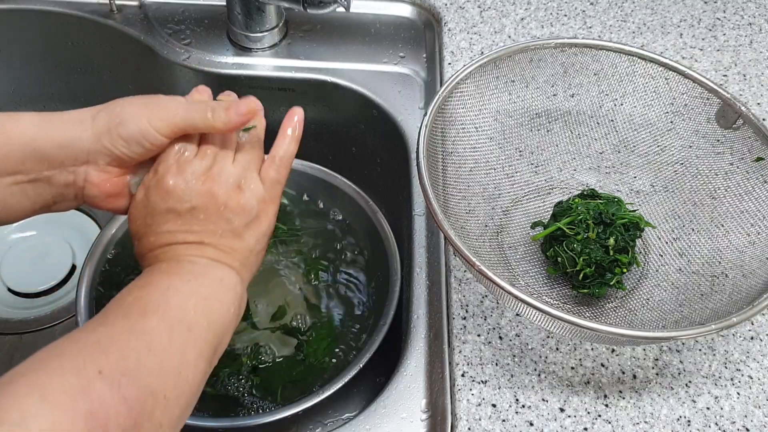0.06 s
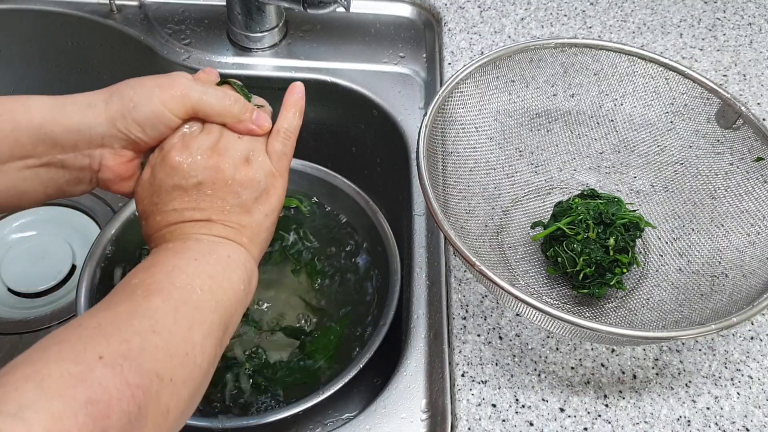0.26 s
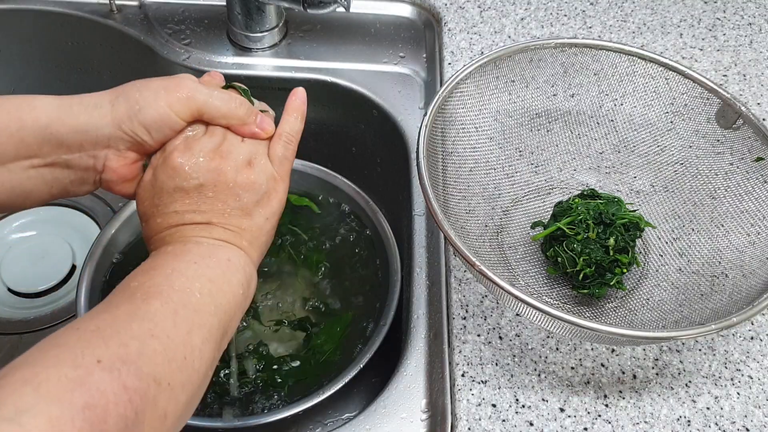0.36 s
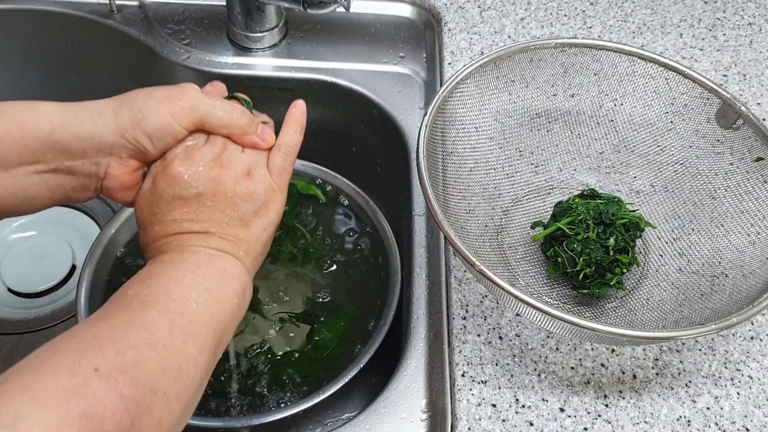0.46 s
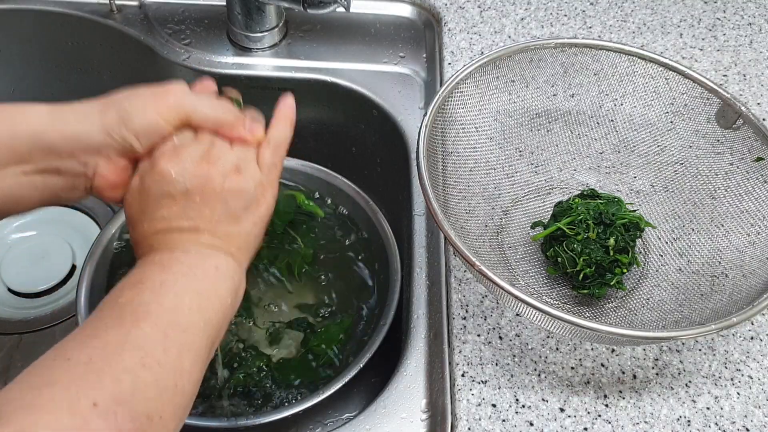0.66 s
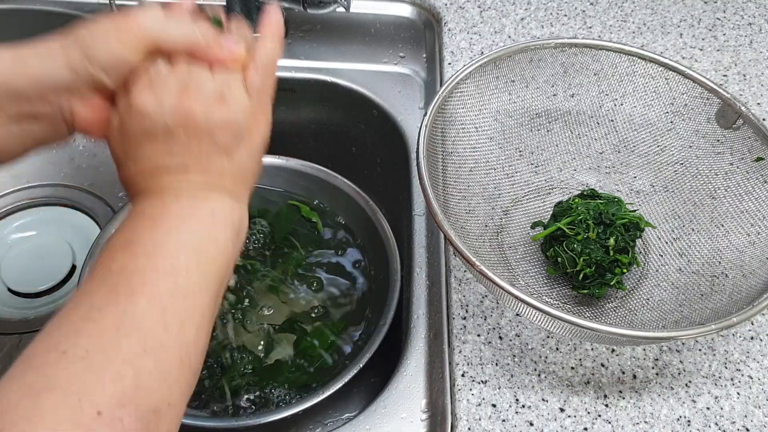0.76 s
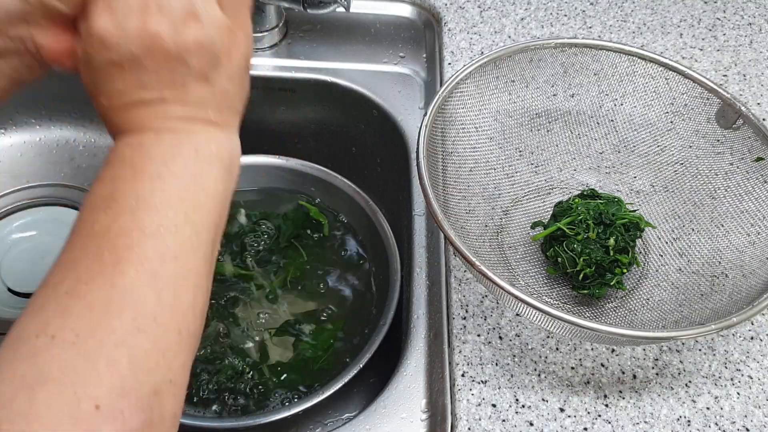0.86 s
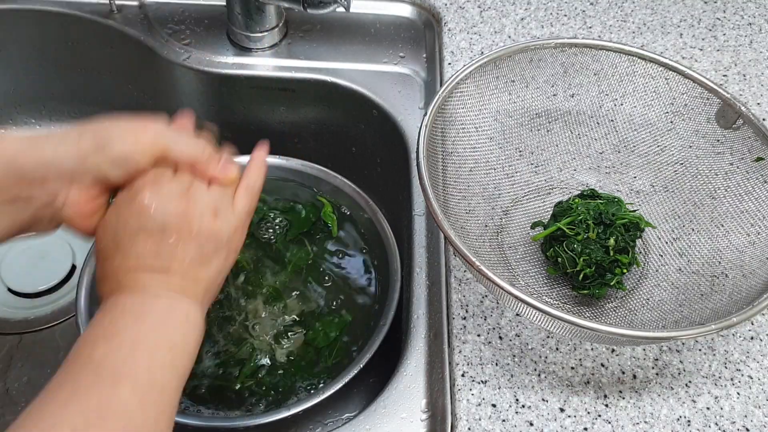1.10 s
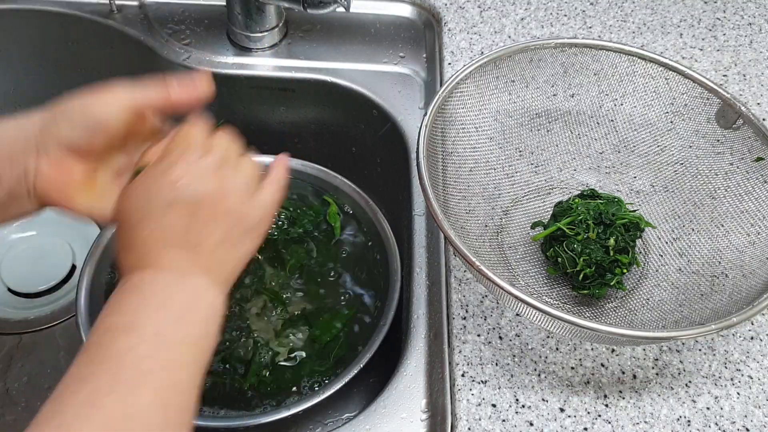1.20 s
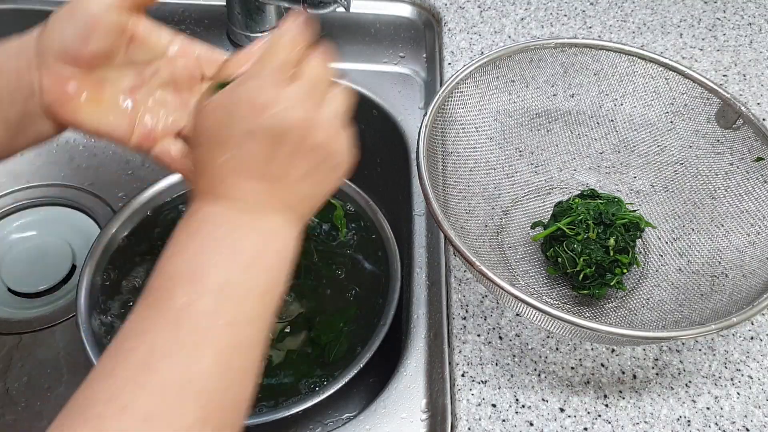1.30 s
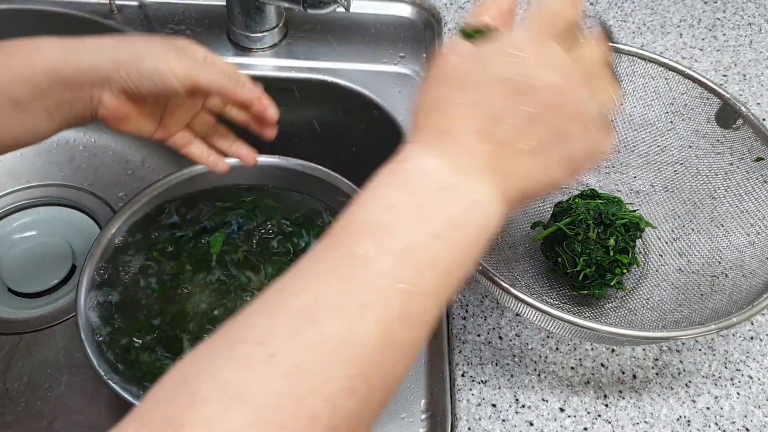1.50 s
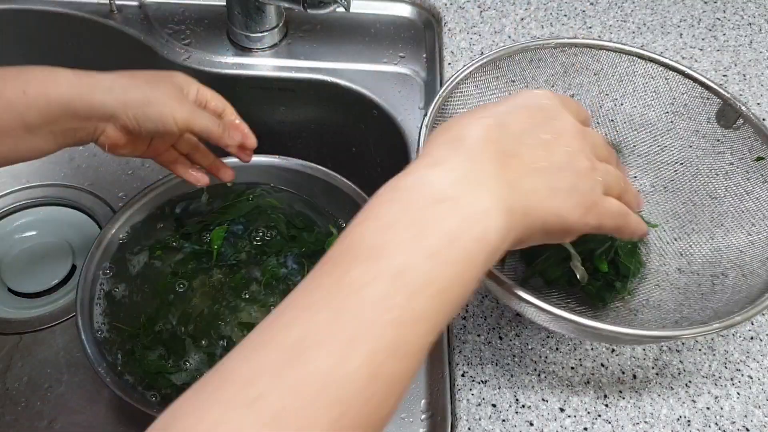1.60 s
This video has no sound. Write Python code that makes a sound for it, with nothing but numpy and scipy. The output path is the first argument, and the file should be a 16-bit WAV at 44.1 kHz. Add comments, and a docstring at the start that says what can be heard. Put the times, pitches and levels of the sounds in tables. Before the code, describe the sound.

Water squeezed from wet leaves spatters and drips into a steel bowl of water.

```python
"""Water, squeezed by two hands from a ball of wet leaves, slaps and spatters into a steel bowl of water.
Bursting films smack, and trapped pockets of air resonate as bubbles, the deepest ringing the bowl.
Air squeaks and fizzes out of the leaves, and the hands part with wet smacks.
The sink around the bowl and the kitchen reflect it all, over room noise and a low hum."""
import sys
import numpy as np
from scipy import signal
from scipy.fft import rfft, irfft
from scipy.io import wavfile

SR = 44100
rng = np.random.default_rng(int(sys.argv[2]) if len(sys.argv) > 2 else 0)


def to_wav(s):
    """Save 16-bit WAV."""
    ch = np.atleast_2d(s).T  # columns
    pcm = np.round(np.clip(ch, -1, 1) * 32767)  # PCM
    wavfile.write(sys.argv[1], SR, pcm.astype(np.int16))


N = 72765


# water squirting from the leaves and hitting the bowl: start_s, pitch_hz, level_db, t60_s
WATER_SMACKS = [(0.1949, 7340, -21.5, 0.0015), (0.3153, 5500, -3.5, 0.0017), (0.3366, 1660, -21, 0.017),
                (0.4643, 3250, -20, 0.0055), (0.511, 1370, -26.5, 0.0041), (.668, 7860, -23, 0.0037),
                (.704, 3200, -17.5, 0.0016), (.909, 6800, -12.5, 0.00099), (0.9584, 6630, -13.5, 0.0014)]
# wet skin peeling off the leaves as the hands part: start_s, pitch_hz, level_db, t60_s
SKIN_PEELS = [(1.1692, 7110, -15.5, 0.0023), (1.1715, 5320, -23.5, 0.0053), (1.2308, 4700, -15.5, 0.0022)]

def smacks(table):
    """Impulse excitation: a bursting film of water gives a brief, heavily damped oscillation."""
    out = np.zeros(N)
    for start_s, hz, db, t60_s in table:
        add(out, start_s, amp(db) * resonance(hz, t60_s, attack_s=0.00026))
    return out


# sheets of water or wet leaves tearing into droplets: start_s, centre_hz, width_octaves, level_db
SPLATS = [(0.2252, 11300, 0.47, -43), (0.315, 2380, 0.42, -31), (.3208, 4070, 0.27, -30.5),
          (.3368, 1960, 0.11, -29), (.449, 11300, .5, -43), (0.5095, 12300, 0.83, -40.5),
          (0.611, 8900, 1, -42.5), (0.672, 5500, 0.11, -38), (0.8154, 9150, 1, -40),
          (.889, 3470, 0.28, -38), (0.9574, 3820, 0.18, -39), (.964, 1110, 0.41, -51.5),
          (1.1692, 6200, 0.26, -49), (1.233, 4600, .2, -47), (1.346, 1990, 0.16, -45.5),
          (1.371, 897, 0.13, -49)]

def splats(drops_per_s=18000, spread_db=7, attack_s=0.00089, t60_s=0.049):
    """Shot noise: a dense shower of tiny bursts merges into a band of noise that dies away."""
    out, hz, t = np.zeros(N), np.fft.rfftfreq(N, 1 / SR), np.arange(N) / SR
    fade = np.minimum(t / attack_s, 1) * decay(t, t60_s)
    for start_s, centre_hz, octaves, db in SPLATS:
        signs = np.sign(rng.standard_normal(N))
        sizes = amp(spread_db * np.minimum(rng.exponential(size=N), np.e))
        clicks = signs * sizes * (rng.random(N) < drops_per_s / SR)
        band = np.exp(-.5 * (np.log2((hz + 1) / centre_hz) / octaves) ** 2)
        add(out, start_s, amp(db) * fade * unit(irfft(rfft(clicks) * band, N)))
    return out


# air pockets rung by falling water: start_s, pitch_hz, level_db
BUBBLES = [(0.316, 2488, -24), (0.465, 2640, -31), (.492, 3290, -28), (0.5103, 3470, -28.5),
           (.742, 1590, -35.5), (.810, 2030, -33.5), (.816, 2160, -33.5), (.817, 3810, -29),
           (0.85, 1194, -43)]

def bubbles(attack_s=0.00016, rise_per_s=0.49):
    """Bubble resonance: smaller pockets ring higher and die sooner; each sheds four satellites."""
    satellite_db, scatter_octaves, within_s = -7.5, 0.38, 0.013
    out = np.zeros(N)
    for start_s, hz, db in BUBBLES:
        t60_s = 0.035 * (920 / hz) ** 0.92
        add(out, start_s, amp(db) * resonance(hz, t60_s, attack_s, rise_per_s))
        for late, pitch in rng.random((4, 2)):
            satellite_hz = hz * 2 ** (scatter_octaves * (2 * pitch - 1))
            ring = resonance(satellite_hz, 0.43 * t60_s, attack_s, rise_per_s)
            add(out, start_s + late * within_s, amp(db + satellite_db) * ring)
    return out


# gobs of water, each trapping one big air pocket: start_s, pitch_hz, level_db, t60_s
PLOPS = [(.4578, 948, -34, 0.031), (.5102, 745.5, -29, .06), (.6118, 773, -34, 0.027)]

def plops(attack_s=0.00015, bowl_db=-6.5):
    """Sympathetic resonance: deep plops near the bowl's own pitch set it ringing."""
    pockets = np.zeros(N)
    for start_s, hz, db, t60_s in PLOPS:
        add(pockets, start_s, amp(db) * resonance(hz, t60_s, attack_s, rise_per_s=1.7))
    bowl_mode = resonance(hz=762.3, t60_s=.35, attack_s=attack_s)
    bowl_ring = signal.fftconvolve(pockets, 2 * bowl_mode / abs(bowl_mode).sum())[:N]
    return pockets + amp(bowl_db) * bowl_ring


# envelope of the spatter, swelling with each squeeze: time_s, level_db
SPATTER_ENVELOPE = [(.25, -75.5), (.31, -54.5), (.355, -52.5), (.46, -50.5), (.55, -53), (.65, -56.5),
                    (.735, -46), (.795, -56), (.822, -57.5), (.88, -57), (.94, -64), (1.17, -104),
                    (1.225, -52), (1.39, -57.5), (1.45, -100)]
# strength of its bubbles: pitch_hz, relative_db
SPATTER_SPECTRUM = [(600, -10), (1000, -19), (1400, -13.5), (2000, -7.5), (3500, 3.5), (6500, 0.5)]

def spatter():
    """Air entrainment: pressed-out water rains into the bowl and rings many small bubbles."""
    rain = swarm(SPATTER_SPECTRUM, per_s=1000, cycles=8.6, spread_db=2.5, glide=0.2)
    return envelope(SPATTER_ENVELOPE) * rain


# leaves and water sloshing in the bowl: start_s, length_s, level_db
SLOSHES = [(0.488, 0.09, -56), (0.749, 0.056, -55.5), (1.099, 0.18, -58), (1.338, 0.096, -62)]
# strength of the gurgles: pitch_hz, relative_db
SLOSH_SPECTRUM = [(200, -2), (550, -6.5), (1050, 4), (1400, -43)]

def slosh():
    """Heavy damping: low bubbles die within a few cycles and blur into soft swells of gurgling."""
    swell = np.zeros(N)
    for start_s, length_s, db in SLOSHES:
        add(swell, start_s, amp(db) * np.hanning(round(length_s * SR)))
    gurgles = swarm(SLOSH_SPECTRUM, per_s=500, cycles=3.9, spread_db=2, glide=0.062)
    return swell * lowpass(gurgles, hz=1300, order=6)


# envelope of the fizz among the leaves: time_s, level_db
FIZZ_ENVELOPE = [(.02, -53.5), (.1, -67), (.17, -63.5), (.235, -55), (.3, -56.5), (.37, -52), (.435, -55),
                 (.458, -51), (.52, -47), (.59, -49), (.73, -53.5), (.88, -56), (.945, -61.5), (.965, -51),
                 (1.08, -68.5), (1.16, -54.5), (1.235, -43.5), (1.33, -53.5), (1.45, -70)]
# strength of its bubbles: pitch_hz, relative_db
FIZZ_SPECTRUM = [(3500, -9), (4500, -2.5), (7300, 4), (8800, -8.5), (11000, 8), (16000, -7)]

def fizz():
    """Incoherent addition: tiny bubbles bursting in one hand supply half the power of the fizz."""
    bursts = swarm(FIZZ_SPECTRUM, per_s=2300, cycles=27.0, spread_db=5.5, glide=0.017)
    return envelope(FIZZ_ENVELOPE) * bursts / np.sqrt(2)


def squeak(start_s=.209, length_s=.066, start_hz=778, rise_octaves=1.6, db=-44.5, fade_db=-28):
    """Flow-induced oscillation: air leaving by a narrowing gap sounds a rough, rising, fading tone."""
    t, out = np.arange(0, length_s, 1 / SR), np.zeros(N)
    closure = t / length_s
    hz = start_hz * 2 ** (rise_octaves * closure ** 2.7)
    tone = np.sin(2 * np.pi * np.cumsum(hz) / SR)
    ramps = np.minimum(np.minimum(t, length_s - t) / 0.00089, 1)
    add(out, start_s, ramps * amp(db + fade_db * closure ** 2) * tone)
    roughness = 1 + 0.24 * wander(rate_hz=500)
    return out * roughness


def resonance(hz, t60_s, attack_s, rise_per_s=0):
    """Damped oscillator: a dying sine, whose pitch can climb as a bubble's does near the surface."""
    t = np.arange(0, t60_s + 2 * attack_s, 1 / SR)
    fade = decay(t, t60_s) * (1 - np.exp(-t / attack_s))
    return fade * np.sin(2 * np.pi * hz * (t + rise_per_s * t ** 2 / 2))


def swarm(spectrum, per_s, cycles, spread_db, glide):
    """Superposition: many bubbles of random onset, pitch and strength, scaled to rms 1."""
    out, draws = np.zeros(N), np.random.default_rng(rng.integers(N))
    low_hz, high_hz = spectrum[0][0], spectrum[-1][0]
    for when, pitch, strength, polarity in draws.random((int(per_s * N / SR), 4)):
        hz = low_hz * (high_hz / low_hz) ** pitch
        ring = resonance(hz, t60_s=cycles / hz, attack_s=1 / (4 * hz), rise_per_s=glide * hz / cycles)
        db = by_hz(spectrum, hz) + spread_db * min(-np.log(1 - strength), np.e)
        add(out, when * N / SR, np.sign(polarity - .5) * amp(db) * ring / np.linalg.norm(ring))
    return unit(out)


def sink_echoes(t, echoes_per_s=4000, first_s=.0012):
    """Early reflections: the small steel sink returns quick echoes with little bass."""
    taps = rng.choice([-1., 1.], (2, len(t))) * (rng.random((2, len(t))) < echoes_per_s / SR)
    echoes = taps * (t > first_s) * decay(t, t60_s=0.04)
    return echoes - lowpass(echoes, hz=840, order=1)


# reverberation time of the kitchen: frequency_hz, t60_s
KITCHEN_DECAY = [(1000, 0.33), (7000, 0.27), (15000, 0.15)]

def kitchen_tail(t, build_s=0.011):
    """Reverberation: a diffuse field builds up and decays, the treble soonest."""
    hz, frame_s, noise = signal.stft(rng.standard_normal((2, len(t))), SR, nperseg=256)
    fade = decay(frame_s, by_hz(KITCHEN_DECAY, hz)[:, None])
    tail = signal.istft(noise * fade, SR)[1][:, :len(t)]
    return tail * np.minimum(t / build_s, 1)


def space(x, lag_s, left_db, echo_db):
    """Multipath propagation: direct sound reaches the left first; sink and kitchen echoes follow."""
    t = np.arange(SR // 2) / SR
    paths = [(1, sink_echoes(t)), (-5.5, kitchen_tail(t))]  # relative_db, impulse response
    response = sum(amp(db) * h / np.linalg.norm(h, axis=1, keepdims=True) for db, h in paths)
    echoes = signal.fftconvolve(x[None], response, axes=1)[:, :N]
    delay = np.exp(-2j * np.pi * np.fft.rfftfreq(N, 1 / SR) * lag_s)
    direct = np.array([x, irfft(rfft(x) * delay, N)])
    return (direct + amp(echo_db) * echoes) * lean_left(left_db)


# spectral density of the kitchen's noise: frequency_hz, relative_db
ROOM_SPECTRUM = [(20, -17), (38, -19.5), (58, 3.5), (105, -5.5), (190, -15.5), (300, -14.5), (450, -8.5),
                 (700, -18.5), (1200, -36), (5000, -42), (7000, -26), (9000, -40.5), (11500, -26),
                 (16000, -39.5)]
# its likeness between left and right: frequency_hz, correlation
ROOM_CORRELATION = [(70, 0.91), (500, 0.72), (4000, 0.153)]

def background(noise_db=-58, hum_hz=68.9, hum_db=-70.5):
    """Partial coherence: steady room noise, most alike at both ears in the bass, and a wavering hum."""
    hz = np.fft.rfftfreq(N, 1 / SR)
    left, independent = rfft(rng.standard_normal((2, N)))
    correlation = by_hz(ROOM_CORRELATION, hz)
    right = correlation * left + np.sqrt(1 - correlation ** 2) * independent
    noise = irfft(np.array([left, right]) * amp(by_hz(ROOM_SPECTRUM, hz)), N)
    waver = 1 + 0.1 * wander(rate_hz=8.4)
    hum = waver * np.sin(2 * np.pi * hum_hz * np.arange(N) / SR)
    return (amp(noise_db) * unit(noise) + amp(hum_db) * unit(hum)) * lean_left(db=0.5)


def amp(db):
    """Decibels to gain."""
    return 10 ** (np.asarray(db) / 20)


def unit(x):
    """Normalisation to rms 1."""
    return x / np.sqrt(np.mean(x ** 2) + 1e-20)


def decay(t, t60_s):
    """Exponential decay: 60 dB down at t60_s."""
    return np.exp(-np.log(1000) * t / t60_s)


def by_hz(table, hz):
    """Interpolation along log frequency."""
    knots_hz, values = np.transpose(table)
    return np.interp(np.log(hz + 1), np.log(knots_hz), values)


def envelope(curve):
    """Gain per sample from rows of time_s, level_db."""
    return amp(np.interp(np.arange(N) / SR, *np.transpose(curve)))


def add(mix, start_s, sound):
    """Superposition of a sound on the mix."""
    part = mix[max(round(start_s * SR), 0):][:len(sound)]
    part += sound[:len(part)]


def lean_left(db):
    """Level difference: the left gains db and the right loses it."""
    return amp([[db], [-db]])


def wander(rate_hz):
    """Random modulation: low-passed noise at rms 1."""
    hz = np.fft.rfftfreq(N, 1 / SR)
    return unit(irfft(rfft(rng.standard_normal(N)) * np.exp(-(hz / rate_hz) ** 2), N))


def lowpass(x, hz, order):
    """Attenuation above a cutoff."""
    return signal.sosfilt(signal.butter(order, hz, fs=SR, output="sos"), x)


# delay at the right ear, one for each hand: lag_s
HAND_LAGS = [0.000137, .00003]

def scene(bowl_lag_s=0.000096, spurt_db=3):
    """Superposition: the bowl, the two hands above it and the background add at each ear."""
    bubbling = space(bubbles() + spatter() + slosh(), bowl_lag_s, left_db=1.2, echo_db=1.0)
    plopping = space(plops() + squeak(), bowl_lag_s, left_db=1.2, echo_db=-1.5)
    smacking = space(smacks(WATER_SMACKS) + splats(), bowl_lag_s, left_db=1.1, echo_db=-0.5)
    peeling = space(smacks(SKIN_PEELS), lag_s=.00003, left_db=1.5, echo_db=-3.5)  # high above the sink
    spurts = amp(spurt_db * wander(rate_hz=38))
    fizzing = sum(space(spurts * fizz(), lag_s, left_db=0.6, echo_db=-0.5) for lag_s in HAND_LAGS)
    return smacking + bubbling + plopping + peeling + fizzing + background()


def record(dry, cutoff_hz=16100):
    """Band limiting: a steep low-pass filter removes the highest treble."""
    kernel = signal.firwin(511, cutoff_hz, window=("kaiser", 9), fs=SR)
    return signal.oaconvolve(dry, kernel[None], "same")


dry = scene()
out = record(dry)
to_wav(out)
```